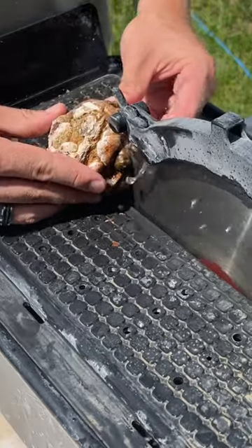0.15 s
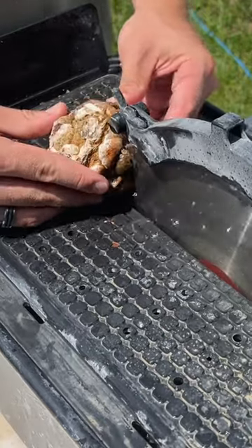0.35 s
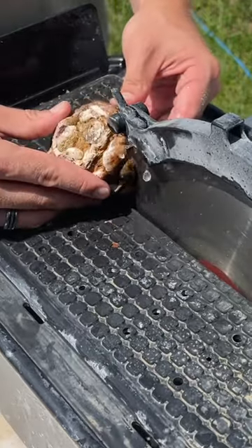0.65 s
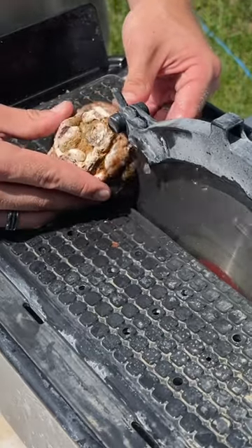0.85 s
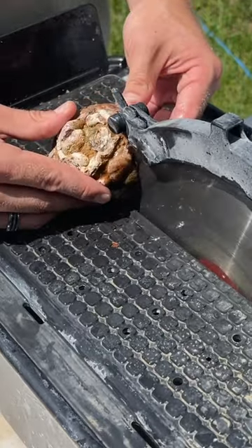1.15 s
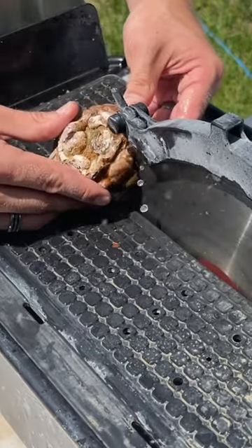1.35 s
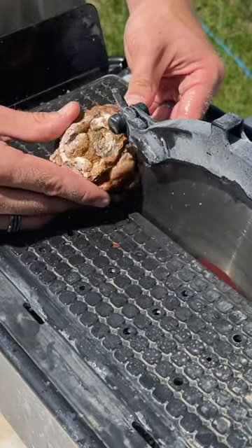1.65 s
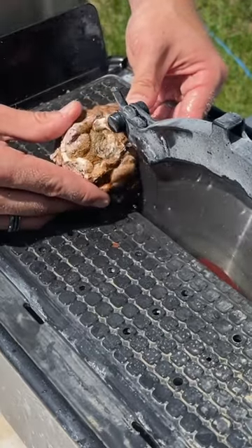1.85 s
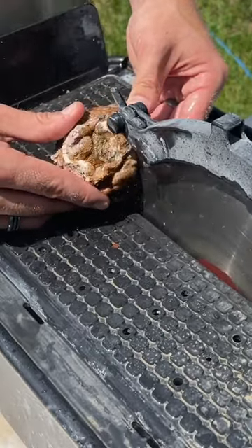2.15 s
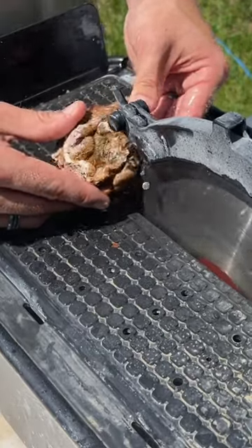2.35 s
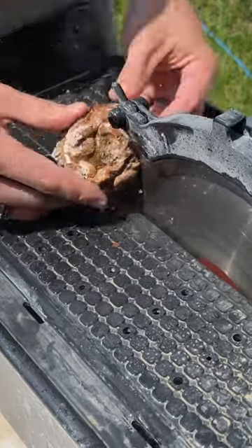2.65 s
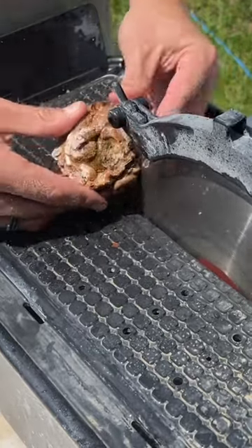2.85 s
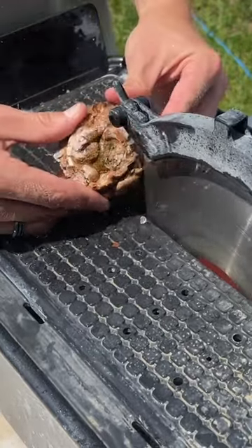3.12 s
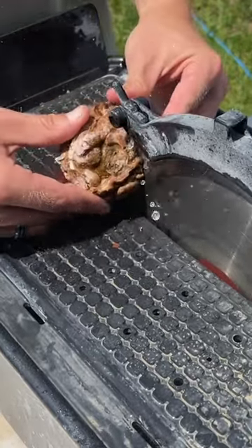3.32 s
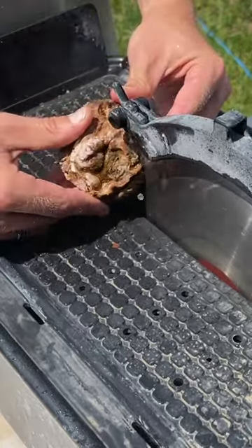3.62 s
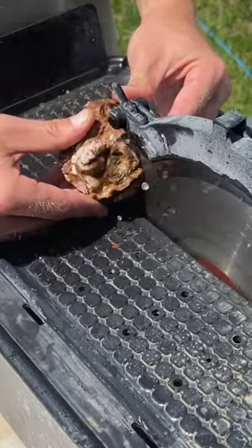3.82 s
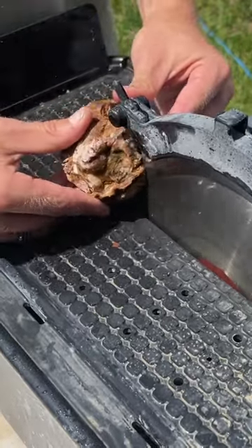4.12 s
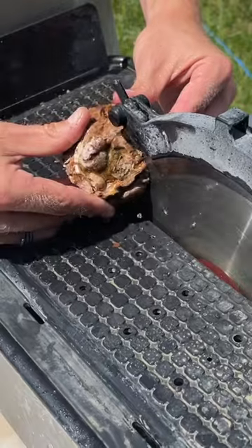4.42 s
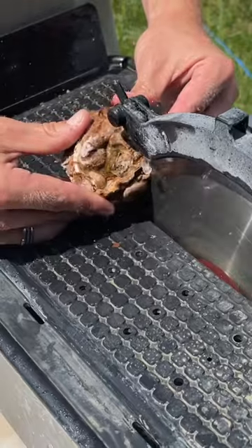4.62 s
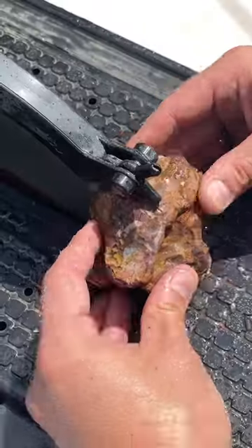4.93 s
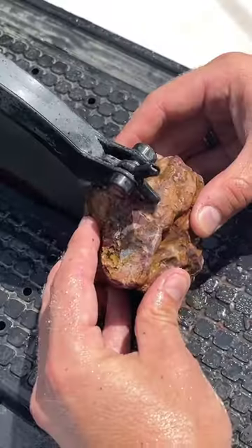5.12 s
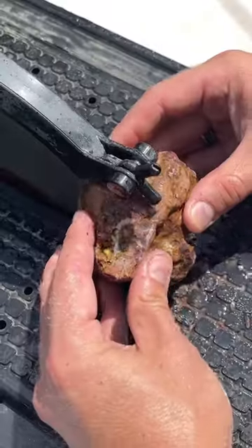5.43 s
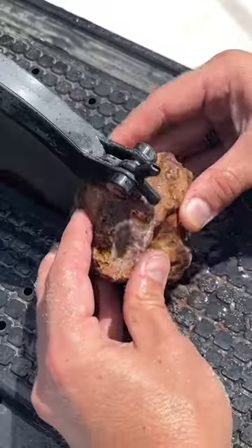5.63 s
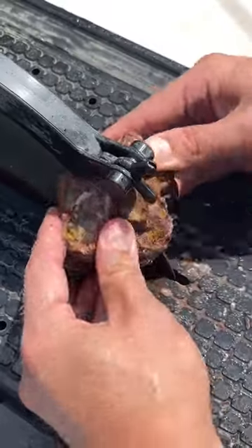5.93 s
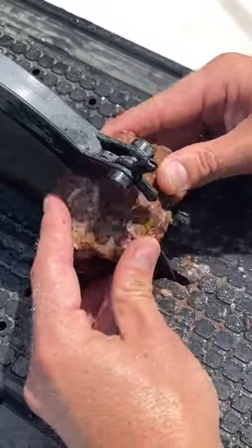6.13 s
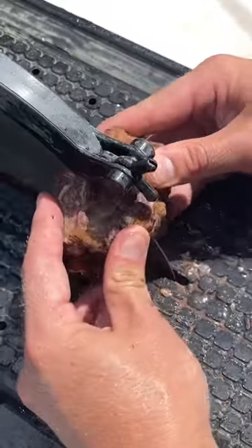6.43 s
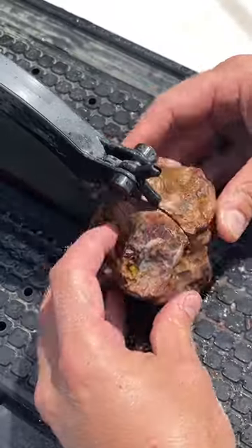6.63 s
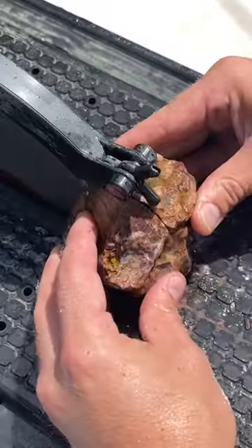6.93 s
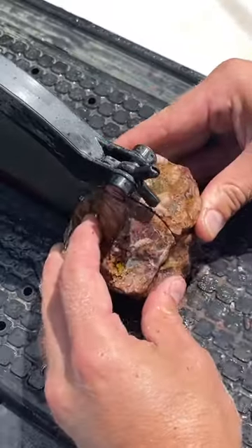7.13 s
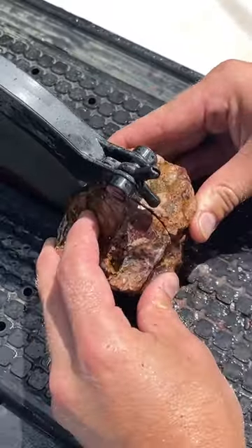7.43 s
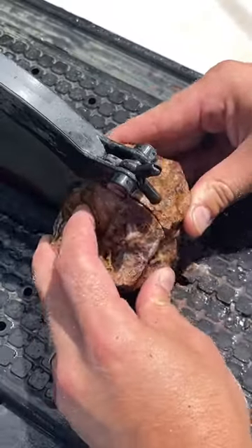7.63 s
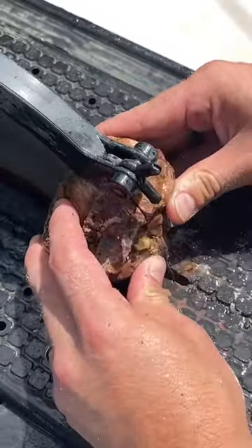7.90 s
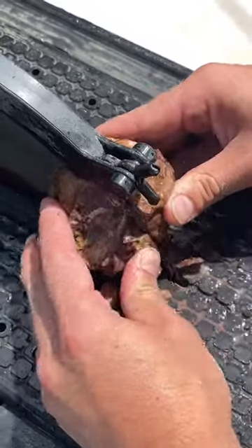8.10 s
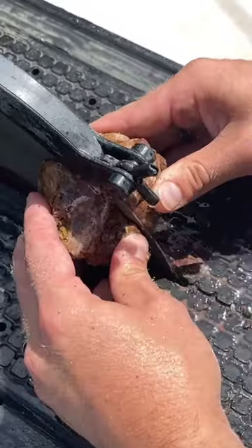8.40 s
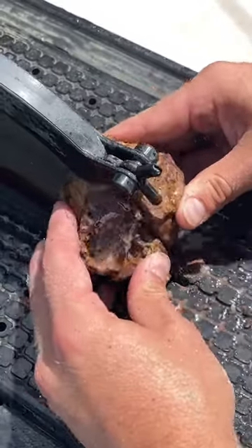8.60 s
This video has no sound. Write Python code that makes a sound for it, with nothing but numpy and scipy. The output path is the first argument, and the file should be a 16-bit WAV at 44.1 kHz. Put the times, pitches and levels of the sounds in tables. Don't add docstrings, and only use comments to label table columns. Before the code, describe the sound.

From 0 seconds a wet tile saw is already cutting a rock outdoors: a steady, bright, sped-up whine with gritty scratching, a chattering guard, thin pump hum and faint spray hiss. Low wind buffets the one microphone, strongest around 1 to 3 seconds. Individual tones swell and sink as the rock is reseated. At about 2.5 seconds the rock lifts, the grinding thins and the blade runs up slightly, then it bites harder near 2.7 to 3. At 4.84 the view and microphone jump; the whine is higher and differently coloured. Short lifts near 4.9, 6.0, 6.6 and 8.0 dip the scrape, with rattle between. At 8.3 it abruptly becomes far louder and closer at true speed: rapid throbbing grinding bites, about thirty a second, ringing metal, sharp stone snaps and dull table knocks from 8.4, the bites weakening and brightening towards the end at about 8.75.

```python
import sys
import numpy as np
from scipy import signal
from scipy.fft import rfft, irfft
from scipy.io import wavfile
from scipy.ndimage import uniform_filter1d, map_coordinates

SR = 44100
rng = np.random.default_rng(int(sys.argv[2]) if len(sys.argv) > 2 else 0)


def volts_from_db(level):
    exponent = np.asarray(level, float) / 20
    return 10 ** exponent


def wrap_up_sound(samples):
    columns = np.atleast_2d(samples).T
    tamed = np.clip(columns, -1, 1)
    steps = np.round(tamed * 32767).astype(np.int16)
    wavfile.write(sys.argv[1], SR, steps)


N = 386316
MIC_MOVE_S, TRUE_SPEED_S = 4.838, 8.292
FRESH_KNEE_HZ = 6400
RETURN_S = 0.021

# columns start/s, end/s, coarse scratch/dB, fine scratch/dB
LIFTS = [
    (2.483, 2.653, -3, -2),
    (4.905, 5.005, -8.5, -8),
    (5.987, 6.063, -11, -6.5),
    (6.581, 6.73, -11.5, -5),
    (7.853, 7.94, -2, -1.5),
    (8.02, 8.29, -6.5, -2.5),
]
# columns t/s, pressure/dB, brightness/dB (higher as the rim bites shallower)
FEED = [(0, -1, 2.5), (.38, 0, 1.5), (.8, 1, 0.5), (1.3, 0, 1.5), (2.33, -2.5, 2.5), (2.72, 2, 1),
        (2.89, -1.5, 2), (2.98, 3.5, 0.5), (3.35, 0, 2), (4.29, -0.5, 2), (4.78, 0, 2.5), (5.2, 0.5, -2),
        (6.2, -0.5, -0.5), (6.45, 0.5, 2), (6.93, -0.5, 2), (7.49, -1, -2), (7.8, -0.5, 2), (8.29, -1, 9)]


def rms_one(x):
    return x / np.sqrt(np.mean(x ** 2) + 1e-20)


def columns_at(table, t):
    s, *columns = np.transpose(table)
    return np.array([np.interp(t, s, c) for c in columns])


def at_hz(points, hz):
    points_hz, db = np.transpose(points)
    return np.interp(np.log(hz), np.log(points_hz), db)


def moved(t):
    return (t >= MIC_MOVE_S).astype(int)


def spell(t, s, hold, rise, fall):
    return np.clip(np.minimum((t - s) / rise, (s + hold - t) / fall) + 1, 0, 1)


def drift(shape, rate, steps_per_s):
    run_in = 3000
    r = np.exp(-2 * np.pi * rate / steps_per_s)
    white = rng.standard_normal(shape[:-1] + (shape[-1] + run_in,))
    return rms_one(signal.lfilter([1], [1, -2 * r, r * r], white)[..., run_in:])


def banded_noise(spectrum, patchy_db, patch_rate):
    low, high = spectrum[0][0], spectrum[-1][0]
    edges = np.geomspace(low, high, int(3 * np.log2(high / low)) + 2)
    hz = np.sqrt(edges[1:] * edges[:-1])
    white = rng.standard_normal((2, N))
    flicker = drift((len(hz), N // 64 + 2), patch_rate, SR / 64)
    bands = []
    for k, db in enumerate(at_hz(spectrum, hz)):
        band_pass = signal.butter(2, edges[k:k + 2], "band", fs=SR, output="sos")
        patches = np.interp(np.arange(N) / 64, np.arange(flicker.shape[1]), volts_from_db(patchy_db * flicker[k]))
        bands.append(volts_from_db(db) * patches * signal.sosfilt(band_pass, white[k % 2]))
    bands = np.array(bands)
    return hz, bands / np.sqrt(np.mean(bands.sum(0) ** 2))


def wind(t):
    # columns f/Hz, level/dB per Hz
    colour = [(12, 3.5), (27, 3), (45, -3.5), (92, -12), (200, -32.5)]
    # columns t/s, peak/dB, rise/s, fall/s, the last two over a span of 16 dB
    gusts = [(.42, -55.5, 0.77, 0.85), (.84, -42.5, 0.26, .11), (1.299, -37.5, 0.044, 0.38),
             (1.53, -39.5, .3, 0.16), (2.04, -33, 0.75, 0.14), (2.26, -39.5, 0.64, 0.48),
             (2.68, -37, 0.39, 0.18), (2.9, -46, 0.17, 0.071), (5.04, -57, 0.055, 0.041),
             (6.9, -42, 0.16, 0.081), (7.82, -58, 0.27, .2), (3.38, -58.5, 0.082, 0.95),
             (3.88, -42, 0.072, 0.21), (4.05, -40, 0.096, 0.36), (4.53, -39, 0.45, 0.16),
             (4.8, -44.5, .17, 0.048), (5.65, -46, 0.25, 0.1), (6.23, -56, 1, 0.2),
             (6.589, -41, 0.12, 0.47), (8.18, -54, 0.2, 0.17), (8.75, -55, 0.64, .55)]
    levels_db = [db - 16 * np.maximum((s - t) / rise, (t - s) / fall) for s, db, rise, fall in gusts]
    calm_db = -74
    level_db = np.maximum(np.max(levels_db, axis=0), calm_db) + 3.6 * drift((N,), 8.2, SR)
    lumps = banded_noise(colour, patchy_db=2.0, patch_rate=25.0)[1].sum(0)
    flutter_colour = [(100, 9.5), (250, -1.5), (900, -20.0)]   # f/Hz, level/dB per Hz
    flutter = banded_noise(flutter_colour, patchy_db=5.5, patch_rate=10.0)[1].sum(0)
    return volts_from_db(level_db) * lumps + volts_from_db(1.06 * (level_db + 40.5) - 56.5) * flutter


def spray():
    # columns f/Hz, level/dB per Hz
    colour = [(150, -15), (600, -11.5), (1500, -1), (2500, -25), (15700, -8)]
    return volts_from_db(-62.5) * banded_noise(colour, patchy_db=9.0, patch_rate=6.9)[1].sum(0)


def pump(t):
    # columns f/Hz, level/dB
    places = [
        [(1034, -69), (1275, -66.5)],
        [(1110, -77), (1370, -66)],
    ]
    early, late = (sum(np.sqrt(2) * volts_from_db(db) * np.sin(2 * np.pi * hz * t) for hz, db in tones)
                   for tones in places)
    return np.where(moved(t), late, early)


def table_knocks():
    # columns t/s, level/dB
    knocks = [
        (8.436, -30.5),
        (8.555, -24.5),
        (8.62, -30.5),
        (8.70, -29),
        (8.743, -32.5),
    ]
    # columns f/Hz, level/dB, t60/s
    modes = [
        (220, 1, 0.05),
        (442, -11.5, 0.12),
        (927, -5, 0.12),
    ]
    blows = np.zeros(N)
    for s, db in knocks:
        blows[round(s * SR)] = volts_from_db(db)
    soft = np.hanning(round(0.001 * SR))
    blows = np.convolve(blows, soft / soft.sum())[:N] + 1e-18
    out = 0
    for hz, db, t60 in modes:
        r, w = volts_from_db(-60 / (t60 * SR)), 2 * np.pi * hz / SR
        out = out + signal.lfilter([0, volts_from_db(db) * np.sin(w)], [1, -2 * r * np.cos(w), r * r], blows)
    return out


def chips():
    # columns t/s, level/dB
    flakes = [
        (8.449, -16),
        (8.5213, -16),
        (8.5556, -14),
        (8.617, -23),
        (8.699, -27),
        (8.746, -18),
    ]
    snaps = np.zeros(N)
    for s, db in flakes:
        snaps[round(s * SR)] = volts_from_db(db)
    fading = signal.lfilter([1], [1, -np.exp(-1 / (0.003 * SR))], snaps + 1e-18)
    bright = signal.butter(2, [2500, 7000], "band", fs=SR, output="sos")
    return signal.sosfilt(bright, 0.79 * fading * rng.standard_normal(N))


def disc_rings(t):
    # columns width/Hz, level/dB
    modes = [
        (260, -3),
        (190, 2),
        (89, -3.5),
        (120, -3.5),
    ]
    # columns t/s, four ring pitches/Hz, trade of the third ring for the fourth/dB
    grip = [
        (8.29, 2843, 4280, 5270, 5750, -2),
        (8.42, 2850, 4140, 5350, 5700, -7.5),
        (8.492, 3306, 3995, 5340, 5800, -2),
        (8.55, 3380, 4030, 5300, 5950, -2),
        (8.592, 3370, 4060, 5370, 5800, -6),
        (8.64, 3120, 4080, 5200, 5800, 5),
        (8.70, 2940, 4260, 5220, 6050, 11),
        (8.76, 2940, 4370, 5200, 6100, 9),
    ]
    *tracks_hz, trade_db = columns_at(grip, t)
    rings = 0
    for ring_hz, (width_hz, db), share in zip(tracks_hz, modes, (-0.45, -0.18, -0.92, 0.6)):
        r = np.exp(-np.pi * width_hz / SR)
        sway = signal.lfilter([1], [1, -r], rng.standard_normal((2, N)))
        phase = 2 * np.pi * np.cumsum(ring_hz) / SR
        ring = rms_one(sway[0] * np.cos(phase) + sway[1] * np.sin(phase))
        rings = rings + volts_from_db(db + share * trade_db + 3.3 * drift((N,), 26.0, SR)) * ring
    return rings


def close_cut(t):
    # columns t/s, peak/dB, brightness/dB
    bites = [(8.3103, -20, -5.5), (8.346, -7.5, -0.5), (8.3805, -11, -1.5), (8.41, -8.5, -1),
             (8.446, -13, -12.5), (8.4845, -6, -2.5), (8.519, -8, 3), (8.554, -10.5, 1.5), (8.588, -11, 8),
             (8.614, -7.5, 8.5), (8.6264, -19, -1), (8.6588, -24, 15), (8.6934, -20, 17), (8.723, -20, 15)]
    # columns t/s, level/dB
    grind = [
        (8.285, -17),
        (8.31, -33.5),
        (8.4, -43),
        (8.5, -44),
        (8.58, -36),
        (8.64, -33),
        (8.76, -30),
    ]
    # columns f/Hz, level/dB per Hz
    colour = [(60, -29), (206, -0.5), (361, -13), (940, -5), (1720, -25), (2330, -12.5), (3720, -11),
              (4090, -5.5), (5900, -7), (6600, -21), (9240, -19.5), (11200, -25), (12800, -12),
              (14200, -17.5), (15600, -11)]
    grind_db, = columns_at(grind, t)
    grit_db = -37 + 0.53 * (grind_db + 37.5)
    dull, bright = volts_from_db(grind_db), volts_from_db(grind_db)
    for s, peak_db, tilt_db in bites:
        age = np.clip((t - s + 0.0041) / 0.013, 0, None)
        swell = age ** 2.24 * np.exp(-age * 2.44) * 3.8
        dull = dull + volts_from_db(peak_db - 13.5 - tilt_db) * swell
        bright = bright + volts_from_db(peak_db - 17.0 + tilt_db) * swell
    hz, bands = banded_noise(colour, patchy_db=3.0, patch_rate=28.0)
    clumps = volts_from_db(1.2 * drift((N,), 280.0, SR))
    stone = rms_one(bands[(hz > 1400) & (hz < 7000)].sum(0))
    middle = clumps * (stone + volts_from_db(1.0) * rms_one(disc_rings(t)))
    middle = signal.sosfilt(signal.butter(8, 6500, fs=SR, output="sos"), middle)
    lower = signal.sosfiltfilt(signal.butter(2, 4300, fs=SR, output="sos"), middle)
    throb = (bright / uniform_filter1d(bright, size=SR // 20)) ** 0.76
    top = rms_one(bands[hz >= 7000].sum(0)) * volts_from_db(grit_db) * clumps * throb
    table = volts_from_db(-43.5) * rms_one(bands[hz <= 1400].sum(0))
    return dull * lower + bright * (middle - lower) + table + top + table_knocks() + chips()


def lifted_db(t):
    leave_s = 0.0046
    lost = 0
    for start, end, *db in LIFTS:
        away = np.minimum((t - start) / leave_s, (end + RETURN_S / 2 - t) / RETURN_S)
        lost = lost + np.outer(db, np.clip(away, 0, 1))
    return lost


def chatter(t):
    # columns t/s, hold/s, settling/s, fresh share/0-1, rattle/dB
    spells = [(0, 0.27, 0.1, 0.55, 18.5), (0.412, 0.97, 0.056, 0.23, 4.5), (1.497, 0.068, 0.39, 0.4, 11),
              (2.455, 0.2, 0.077, 0.74, 17.5), (2.868, 0.24, 0.04, .45, 16),
              (4.08, 0.041, 0.11, 0.05, 14.5), (4.624, 0.033, 0.04, 0.4, 12),
              (4.887, 0.15, 0.12, 0.43, 15.5), (5.1, 1.33, 0.045, 0.26, 8.5), (5.437, 0.055, .06, 0.15, 8),
              (5.636, 0.027, 0.069, 0.23, 5), (5.856, 0.1, .1, 0.4, 8.5), (6.07, 0.13, 0.06, 0.5, 7),
              (6.472, 0.24, 0.097, 0.62, 17), (6.799, 0.87, 0.14, 0.18, 6.5),
              (7.685, 0.72, 0.091, 0.61, 11.5), (5.1, 0.21, 0.04, -0.3, -3), (7.792, 0.06, 0.02, 0, 0),
              (8.248, 0.1, 0.05, 0, 0)]
    loosen_s, fresh_at_rest = 0.07, 0.26
    fresh, rise_db = sum(np.outer(both, spell(t, s, hold, loosen_s, settle))
                         for s, hold, settle, *both in spells)
    return np.clip(fresh_at_rest + fresh, .03, .95), rise_db


def fresh_share(t, hz=FRESH_KNEE_HZ):
    return np.clip(chatter(t)[0] * np.minimum(hz / FRESH_KNEE_HZ, 1) ** 0.34, 0, .97)


def guard_rattle(t):
    # columns f/Hz, level/dB per Hz
    colour = [(300, 2), (1150, 0.5), (1500, 8.5), (2200, 8.5), (3000, -75), (3700, -10), (4200, -54)]
    rattle = banded_noise(colour, patchy_db=1.5, patch_rate=16.0)[1].sum(0)
    boxed = signal.sosfilt(signal.butter(4, 1250, "high", fs=SR, output="sos"), rattle)
    landing = sum(spell(t, end + RETURN_S, 0, RETURN_S, 0.052) for _, end, *_ in LIFTS)
    level_db = -62.5 + chatter(t)[1] + 0.99 * lifted_db(t)[0] + 3.5 * landing
    return (boxed + 0.17 * rattle) * volts_from_db(level_db + 1.3 * drift((N,), 35.0, SR))


def contact_db(t):
    # columns stone/dB, grit/dB, fine grit/dB
    places = [
        (-50, -46.5, -52),
        (-50.5, -46, -53.5),
    ]
    pressure, bright = columns_at(FEED, t)
    coarse, fine = lifted_db(t)
    base = np.transpose(places)[:, moved(t)]
    return base + pressure + np.array([coarse - bright, 0.68 * coarse + 0.88 * fine, fine + bright])


def scratch_db(hz, t):
    # columns f/Hz, level/dB per Hz
    places = [
        [(2570, 3), (3360, -4), (3840, -5), (5020, 4.5), (7510, 7), (9820, 0), (14680, -5.5)],
        [(2570, -12.5), (3360, -22), (3840, -10), (5020, -3.5), (7510, 2), (9820, -2), (14680, -6)],
    ]
    edges_hz = [2400, 5200, 9500, 15700]
    low, high = np.array(edges_hz[:-1]), np.array(edges_hz[1:])
    per_hz = contact_db(t) - 10 * np.log10(high - low)[:, None]
    means = np.array([[at_hz(place, np.linspace(a, b, 20)).mean() for a, b in zip(low, high)]
                      for place in places])
    late = moved(t)
    position = np.interp(np.log(hz), np.log(low * high) / 2, [0, 1, 2])
    blend = sum(np.clip(1 - np.abs(position - k), 0, 1) * (per_hz[k] - means[late, k]) for k in range(3))
    early_colour, late_colour = (at_hz(place, hz) for place in places)
    return blend + np.where(late, late_colour, early_colour)


def grit(t):
    hz, bands = banded_noise([(2300, 0), (16500, 0)], patchy_db=1.2, patch_rate=8.0)
    return sum(band * volts_from_db(scratch_db(centre, t) + 38.0) * np.sqrt(fresh_share(t, centre))
               for centre, band in zip(hz, bands))


def speed(t):
    # columns t/s, speed/turns per s
    steady = [(0, 244), (.81, 241.5), (1.2, 241.5), (2.19, 242.6), (3.1, 242.3), (3.47, 240.6), (3.81, 238),
              (4.834, 240), (4.839, 260.5), (5.1, 262), (5.33, 258.6), (5.8, 260.8), (6.1, 262),
              (6.58, 262.7), (6.97, 265.6), (7.19, 262.6), (7.78, 263.2)]
    # columns t/s, hold/s, return/s, gain/turns per s
    eases = [(0, .19, .13, 5), (.36, .08, .2, 2), (1.13, .02, .05, 2), (1.26, .05, .1, 2),
             (1.39, .16, .2, 4), (1.7, 0, .1, 1.5), (1.94, .03, .26, 2.8), (2.235, 0, .06, 3),
             (2.34, .03, .03, -2.8), (2.45, .22, .04, 6), (2.77, .07, .03, -6), (2.9, 0, .17, 7),
             (3.14, .02, .13, 3.5), (3.4, 0, .07, 1), (3.9, .04, .08, 1.8), (4.125, .02, .1, 7),
             (4.44, .01, .025, -4), (4.485, .02, .09, 5), (4.71, .02, .1, 5), (4.94, .07, .06, 9),
             (5.13, .02, .06, 2), (5.39, .03, .15, 3.5), (5.62, .1, .05, -3.2), (5.94, .05, .03, 3),
             (6.03, .03, .03, 6.5), (6.14, .03, .08, 3.5), (6.3, .11, .04, -6), (6.47, 0, .04, 1.5),
             (6.63, .08, .1, 8), (6.8, 0, .08, 2.5), (7.34, .08, .12, 3), (7.6, .08, .03, 3.5),
             (7.87, 1.5, .1, 6.6)]
    run_up_s = 0.05
    return columns_at(steady, t)[0] + sum(gain * spell(t, s, hold, run_up_s, back)
                                          for s, hold, back, gain in eases)


def seat_db(t, count):
    seats_s = [0, .3, .62, 1.27, 1.6, 2.3, 2.68, 3.12, 3.75, 4.07, 4.46, 4.838, 5.4, 6.03, 6.7, 7.3, 7.7]
    levels = 3.0 * rng.standard_normal((count, len(seats_s)))
    return uniform_filter1d(levels[:, np.searchsorted(seats_s, t, "right") - 1], size=8, axis=1)


def low_orders_db(t):
    places = [
        (-56.5, -59, -66, -64.5, -54, -56.5, -54, -58.5),
        (-65, -60, -57, -56.5, -55, -56.5, -57, -57),
    ]
    base = np.transpose(places)[:, moved(t)]
    base = np.insert(base, 4, (base[3] + base[4]) / 2, axis=0)
    pressure, bright = columns_at(FEED, t)
    loaded = 0.45 * (pressure - bright) + 1.33 * lifted_db(t)[0] - 5 * fresh_share(t) ** 2
    return base + loaded * np.clip(np.arange(1, 10)[:, None] / 3.86, 0, 1)


def singing_db(t, orders):
    # columns t/s, hold/s, order, level/dB; slow swells at the first microphone place
    sings = [(0, 1, 4, 4), (0, 0.42, 7, 12), (0, 0, 9, -27), (.3, 0, 6, 12.5), (.36, 1.4, 9, 5),
             (.35, 1.1, 3, -4.5), (.3, 1.06, 2, -3.5), (.4, 1.3, 4, -9), (1.35, 1.0, 6, 5),
             (1.52, 0.8, 9, 4.5), (1.61, 0.9, 7, 3.5), (1.9, 0.37, 6, 4), (2.3, 0.26, 7, 4.5),
             (2.72, -0.3, 9, 8), (2.7, -0.66, 2, 9), (3.0, 2.2, 3, 5.5), (3.14, 0, 9, 11.5),
             (3.4, 0.9, 8, -6.5), (2.76, 0.09, 10, 16), (4.13, 0, 7, 10), (4.36, -1, 9, 11)]
    sings_later = [(4.82, 0.052, 8, 15), (4.76, 0, 1, 19), (5.063, 0, 7, 12.5), (5.3, 0, 9, 4.5),
                   (5.61, 0.93, 1, 7.5), (5.94, 0.039, 7, 13), (5.94, 0.0079, 8, 13), (5.83, 0.026, 9, 1),
                   (6, 0.11, 7, 5), (6.14, 0.43, 8, 8), (6.56, 0, 7, 9), (6.843, 0.67, 7, 12.5),
                   (7.28, 0.34, 8, 5.5), (8.12, 0.41, 2, -9)]
    # columns t/s,
    # hold/s, order, level/dB
    flares = [(0.12, 0.3, 10, 8), (0.14, 0.044, 4, 11), (0.13, 0.12, 7, 5), (0.35, 0.19, 9, 6),
              (0.57, 0.62, 11, -8), (0.69, 0.37, 3, 3), (0.7, 0.19, 7, -4), (0.96, 0.26, 4, 7),
              (1.25, 0.16, 7, 5), (1.32, 0.24, 8, -7), (1.34, 0.19, 4, 11), (1.34, 0.46, 10, 9),
              (1.45, 0.34, 6, 6.5), (1.59, 0.044, 7, 13.5), (1.73, 0.14, 6, 8), (2.16, 0.11, 2, -5),
              (2.18, 0.18, 4, -6), (2.2, 0.35, 10, 10), (2.31, 0.025, 6, 1), (2.35, 0.07, 9, 8),
              (2.53, 0.11, 9, -10), (2.74, 0.12, 11, 12), (2.9, 0.14, 10, -3), (3.07, 0.39, 6, -8),
              (3.14, 0.38, 10, 3.5), (3.17, 0.56, 5, -5.5), (3.47, 0.3, 9, -4), (3.86, 0.28, 11, -9),
              (4.14, 0.24, 3, 4), (4.24, 0.14, 8, -2), (4.36, 0.22, 9, -5), (4.42, 0.26, 7, 5),
              (4.68, 0.14, 8, -8), (4.84, 0.11, 4, -17), (5.09, 0.05, 7, -12), (5.19, 0.35, 5, -7.5),
              (5.29, 0.18, 7, 6.5), (5.12, 0.16, 6, 6), (5.85, 0.07, 9, 6), (5.81, 0.13, 4, 7),
              (6.07, 0.23, 3, -9), (6.17, 0.24, 6, 7.5), (6.47, 0.063, 4, 4), (6.53, 0.15, 6, 10),
              (6.99, 0.2, 8, 5.5), (7.02, 0.28, 9, -9),
              (0.108, 0.023, 2, 8),
        (0.237, 0.11, 2, -12),
        (1.36, 0, 2, -10),
        (2.62, 0.02, 2, 10),
        (2.928, 0.039, 2, 9),
        (5.38, 0, 1, -16),
        (6.02, 0.017, 1, -8),
        (2.32, 0.07, 15, 11),
        (4.625, 0.019, 15, 11),
        (7.303, 0.63, 15, 4),
              (0.03, 0.55, 24, -12), (0.31, 0.26, 15, 6), (0.5, 0.46, 50, 6), (0.58, 0.3, 28, 6),
                (0.62, 0.69, 26, -12), (0.64, 0.49, 18, 5.5), (0.9, 0.5, 19, 4.5), (5.46, 0.39, 20, -2),
                (1.05, 0.25, 29, 8), (1.26, 0.45, 54, 11), (6.82, 0.18, 25, -9), (6.24, 0.29, 25, -9),
                (1.27, 0.43, 50, 6), (7.03, 0.18, 24, 6), (1.6, 0.67, 34, 5), (1.55, 0.45, 44, 7.5),
                (1.66, 0.64, 40, 6), (2.4, 0.61, 33, -6), (1.57, 0.49, 28, -10), (2.03, 0.51, 44, 9.5),
                (4.26, 0.16, 25, -6), (3.18, 0.5, 27, -15), (3.22, 0.37, 40, 7.5), (2.02, 0.45, 9, 4),
                (4.16, 0.22, 9, 8), (3.31, 0.38, 46, 6.5), (7.22, 0.21, 18, 6), (3.406, 0.37, 28, 6),
                (3.51, 0.45, 51, 8), (3.79, 0.27, 30, -9), (4.5, 0.29, 29, -7), (3.77, 0.31, 21, 11.5),
                (4.877, 0.42, 20, 8), (5.07, 0.69, 23, 7.5), (5.42, 0.22, 19, 6), (6.6, 0.48, 30, -8),
                (6.822, 0.24, 27, -13), (6.996, 0.49, 32, 7.5), (7.008, 0.56, 28, 9.5),
                (7.24, 0.47, 39, -11), (7.78, 0.06, 15, 9), (7.78, 0.06, 27, 12)]

    def swells(rows, ramp):
        return sum(db * (orders == round(k)) * spell(t, s, hold, ramp, ramp) for s, hold, k, db in rows)

    slow = np.where(moved(t), swells(sings_later, 0.21), swells(sings, 0.21))
    return slow + swells(flares, 0.034)


def whine(t):
    unsteady = np.interp(t, np.linspace(0, t[-1], 2000), drift((2000,), 12.38, 218.6))
    turns = np.cumsum(speed(t) + 0.2525 * unsteady) / SR
    when = np.interp(np.arange(2400), turns, t)
    rate = speed(when)
    orders = np.arange(1, 67)[:, None]
    low = orders[:9]
    slow = drift((2, len(orders), len(when)), 2.11, 225)
    fast = 0.5 * drift((2, len(orders), len(when)), 26.0, 290)
    wear = slow + fast
    held = np.sqrt(2) * volts_from_db(seat_db(when, count=len(orders))) * np.exp(1j * (slow[0] + orders ** 2))
    held = held + fast[0] + 1j * fast[1]
    repeated = np.sqrt(rate * (1 - fresh_share(when, orders * rate)))
    pattern = held * volts_from_db(scratch_db(orders * rate, when) - 1.31) * repeated
    pattern *= volts_from_db(1.2 * drift((len(when),), 10.8, 260))
    low_db = low_orders_db(when)
    low_db += 3.6 * (fresh_share(when) + 0.11) * drift((9, len(when)), 11.5, 280) * low / 9
    wobble = 1 + 0.08 * low * (wear[0, :9] + 1j * wear[1, :9])
    phase = np.pi / 2 * low ** 2 + .5 * rng.random((9, 1))
    pattern[:9] = np.sqrt(2) * volts_from_db(low_db) * wobble * np.exp(1j * phase)
    pattern *= volts_from_db(singing_db(when, orders))
    size = 1024
    shapes = irfft(np.vstack([0 * when, pattern]), size, axis=0) * size / 2
    shapes = np.vstack([shapes, shapes[:1]])
    return map_coordinates(shapes, [turns % 1 * size, turns], order=1), turns


def through_blade(x, t):
    # columns f/Hz, width/Hz, level/dB
    places = [
        [(3706, 725, 13.5), (5680, 350, -8.5), (5967, 90, 7), (7970, 350, 3.5), (10630, 460, 4.5), (12600, 150, 6), (12950, 200, 2)],
        [(2891, 52, 11), (6230, 160, 6), (7162, 106, 13), (9120, 1000, 4.5), (11730, 470, 3.5), (14100, 620, 5)],
    ]
    hz = np.fft.rfftfreq(N, 1 / SR)
    heard = []
    for modes in places:
        gain_db = sum(db / (1 + ((hz - f) / width * 2) ** 2) for f, width, db in modes)
        heard.append(irfft(rfft(x) * volts_from_db(gain_db), N))
    return np.where(moved(t), heard[1], heard[0])


def scene():
    t = np.arange(N) / SR
    tone, turns = whine(t)
    hard_spot = 1 + 0.21 * np.cos(2 * np.pi * turns)
    rim = tone + (grit(t) + guard_rattle(t)) * hard_spot
    fast = through_blade(rim, t) + pump(t) + spray()
    close = np.clip((t - TRUE_SPEED_S) / 0.012, 0, 1)
    mono = (1 - close) * fast + close * close_cut(t) + wind(t)
    return np.array([mono, mono])


def low_pass(x):
    return signal.sosfilt(signal.butter(12, 17110, fs=SR, output="sos"), x)


def record(dry):
    rounded = 0.39 * np.tanh(dry / 0.41)
    kept = np.fft.rfftfreq(N, 1 / SR) < 15760
    return low_pass(irfft(rfft(rounded) * kept, N))


dry = scene()
out = record(dry)
wrap_up_sound(out)
```